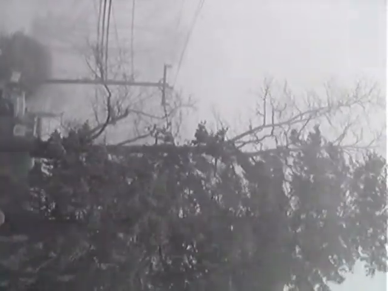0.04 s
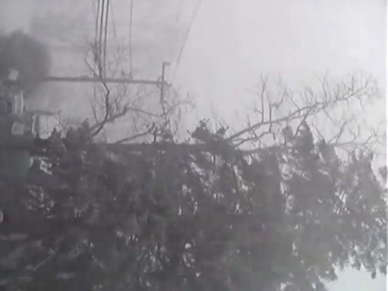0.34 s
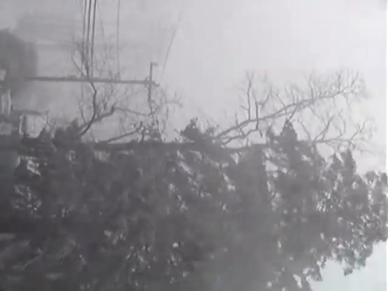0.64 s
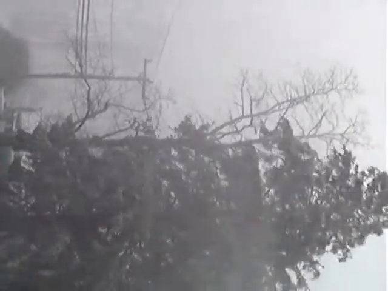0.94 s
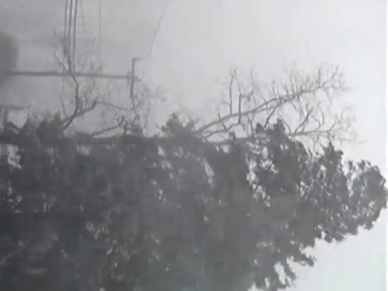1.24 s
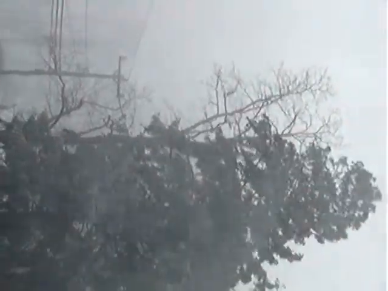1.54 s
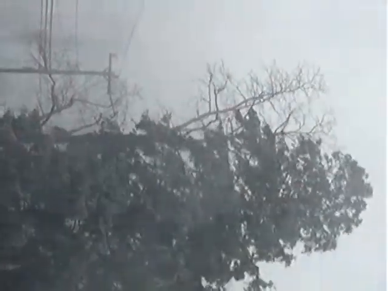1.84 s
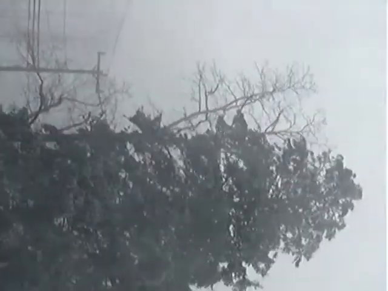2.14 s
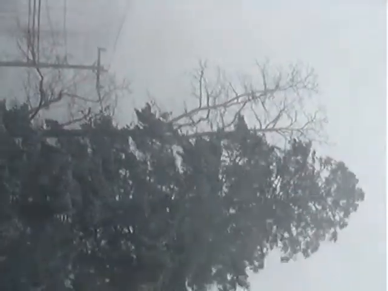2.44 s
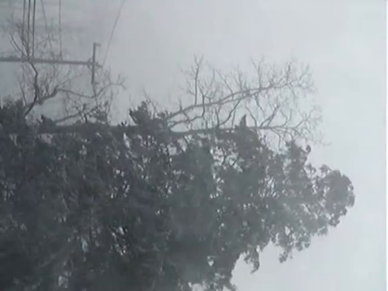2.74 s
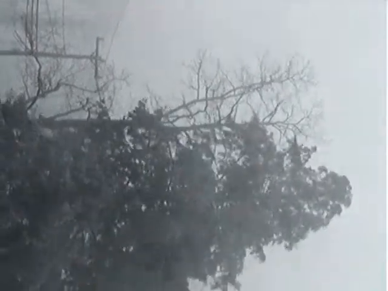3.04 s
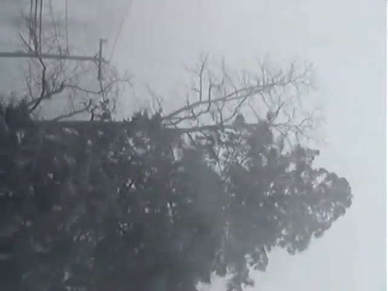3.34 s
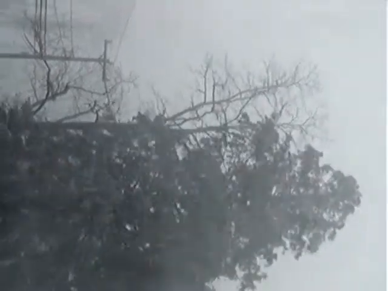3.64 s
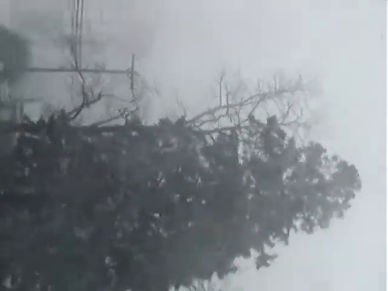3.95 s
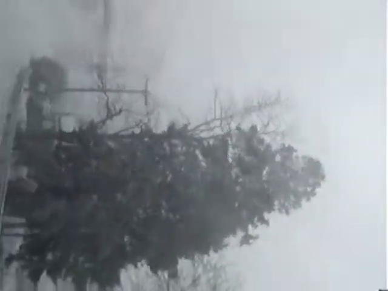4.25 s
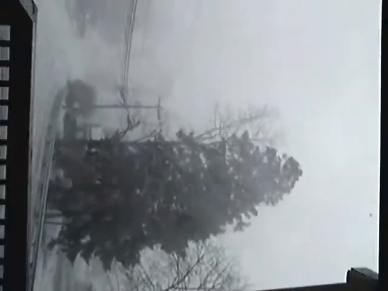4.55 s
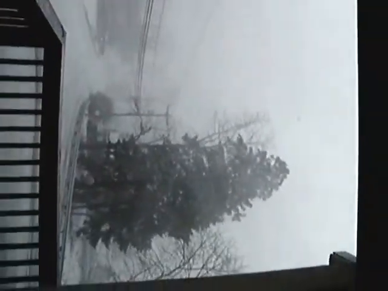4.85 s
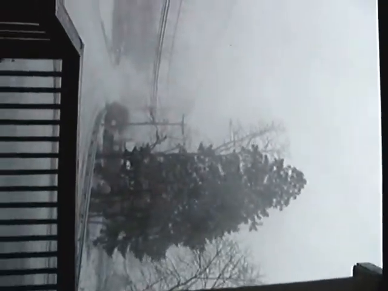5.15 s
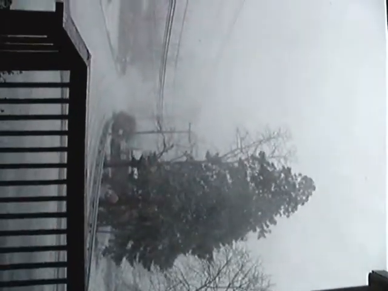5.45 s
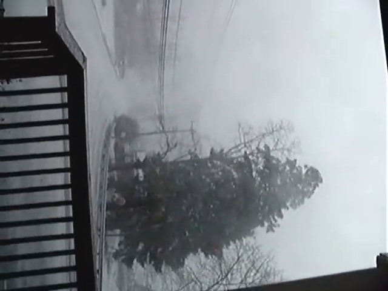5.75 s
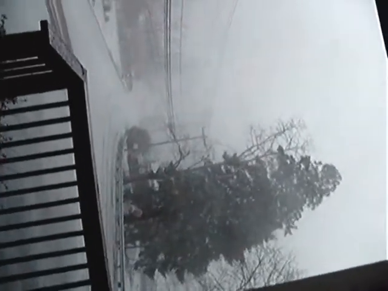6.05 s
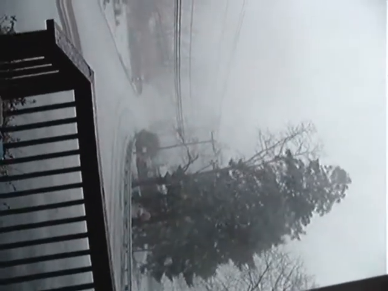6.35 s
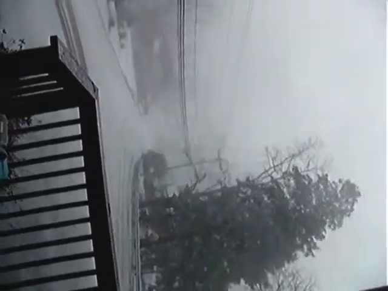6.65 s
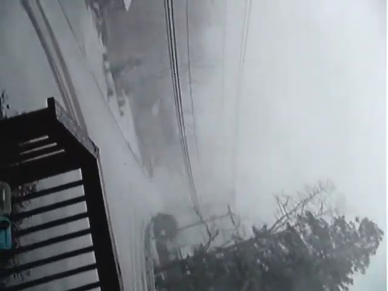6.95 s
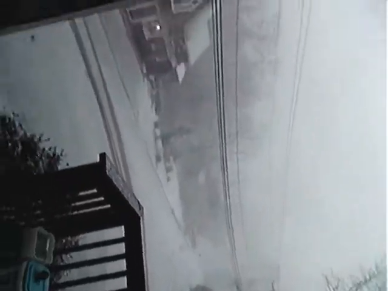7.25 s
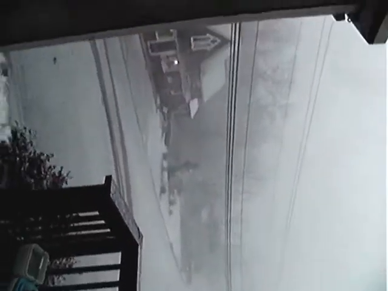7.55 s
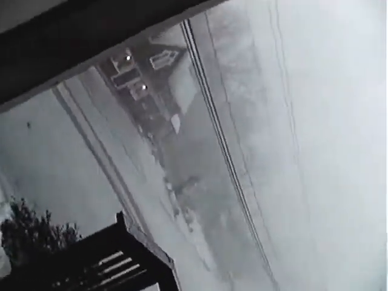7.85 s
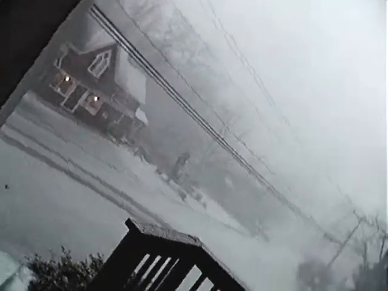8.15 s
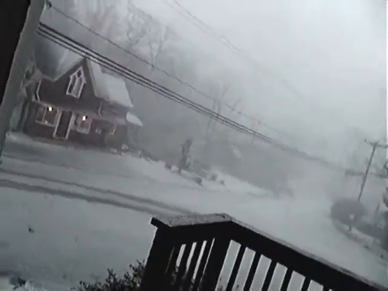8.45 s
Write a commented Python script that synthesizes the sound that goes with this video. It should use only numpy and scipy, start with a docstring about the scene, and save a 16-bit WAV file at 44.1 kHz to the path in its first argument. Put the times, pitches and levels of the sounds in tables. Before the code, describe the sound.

Gusty snowstorm wind roars through trees and hisses with driven snow, heard from a porch with a few faint handling bumps.

```python
"""Wind roars in bare trees: a snowstorm, heard from a porch through one small camera microphone.
Gusts rush through a tall evergreen, drive hissing snow and reach a shrub by the railing; one
whistles briefly, and the far storm rumbles underneath. A nearby wall reflects the wind, and its
hollow colour sinks as the camera moves out and turns.
The hand on the camera adds a soft swish, a few ticks and dull bumps."""
import sys
import numpy as np
from scipy import signal
from scipy.fft import rfft, irfft, next_fast_len
from scipy.io import wavfile
from scipy.ndimage import uniform_filter1d, map_coordinates

SR = 44100
rng = np.random.default_rng(int(sys.argv[2]) if len(sys.argv) > 2 else 0)


def log_audio(samples):
    """Write samples as a 16-bit WAV file to the path given in sys.argv[1]."""
    # one column per channel
    frames = np.atleast_2d(samples).T
    # limit to full scale, then quantise
    limited = np.clip(frames, -1, 1)
    pcm = np.round(limited * 32767).astype(np.int16)
    wavfile.write(sys.argv[1], SR, pcm)


N = 384111


def wind():
    """The wind around the porch: needles, twigs and snow flutter in the same eddies."""
    # the wind between gusts: time_s, level_db
    breeze = [(0, -26), (.55, -22.5), (2.4, -23.5), (3.95, -23.5), (4.9, -22.5), (6.7, -22.3), (7.6, -23),
              (8.15, -26), (8.71, -26)]
    # gusts that swell and ease: peak_s, half_width_s, lift_db
    gusts = [(.8, 0.14, 1), (1.035, 0.058, 2.5), (1.98, 0.18, 2), (2.69, .13, 1), (3, 0.33, 3),
             (4.68, 0.089, 2.1), (5.25, 0.12, 2.1), (5.76, 0.28, 2.5), (6.38, 0.53, 5), (7.5, 0.082, .8)]
    breeze_db, = curves(breeze)
    gust_db = sum(db * swell(peak_s, width_s) for peak_s, width_s, db in gusts)
    flutter = wobble(rate=14)
    return (bare_trees() + evergreen(breeze_db, gust_db, flutter)
            + shrub(flutter) + blown_snow(breeze_db, gust_db, flutter))


def bare_trees(gain_db=0.84):
    """Thick bare branches roar in the wind."""
    # strength of the roar: time_s, level_db
    roar = [(0.0, -27.5), (0.39, -25.5), (1.5, -24.5), (1.92, -26), (2.74, -25), (4.34, -28.5),
            (6.16, -26.5), (6.43, -27.5), (8.71, -28.5)]
    # spectrum of the branches: frequency_hz, level_db
    branches = [(150, -38.5), (240, -16), (285, -1), (330, 0.5), (390, 0.5), (425, -1.5), (480, 1),
                (580, 1.5), (680, -0.5), (820, -1), (1100, -4), (1600, -5), (3000, -42.5)]
    roar_db, = curves(roar)
    return amp(gain_db + roar_db + 0.38 * wobble(rate=7)) * rush(branches, patchy_db=0.3)


def evergreen(breeze_db, gust_db, flutter):
    """Air rushes through the thin needles of a tall evergreen, louder in each gust."""
    # spectrum of the needles: frequency_hz, level_db
    needles = [(400, -52), (900, -12.5), (1300, -6), (1700, -1.5), (2100, 1), (2600, -1.64), (3100, -6.5),
               (3800, -11.5), (4800, -20), (6500, -27.5), (10000, -47)]
    return amp(breeze_db + gust_db + 0.3 * flutter) * rush(needles, patchy_db=-0.12)


def blown_snow(breeze_db, gust_db, flutter, gain_db=2.1, db_per_gust_db=1.18):
    """Driven snow hisses, louder the harder it blows and the more snow the air carries."""
    # snow in the air, as hiss relative to the breeze: time_s, level_db
    snow_load = [(0, -21.5), (.48, -18.5), (1.1, -21), (2.4, -21.5), (4.5, -18.2), (5.3, -18.5),
                 (5.8, -21.5), (7.9, -22.5), (8.71, -18)]
    # spectrum of the hiss: frequency_hz, level_db
    hiss = [(2000, -25), (4000, -8), (5200, 2.5), (6400, 2.5), (7200, -3.5), (8500, -2.5), (9300, -5.5),
            (10000, -15)]
    load_db, = curves(snow_load)
    level_db = gain_db + breeze_db + load_db + db_per_gust_db * gust_db + 0.5 * flutter
    return amp(level_db) * rush(hiss, patchy_db=1.0)


def shrub(flutter):
    """A late gust reaches the twigs of a shrub beside the railing."""
    # the gust in the shrub: time_s, level_db
    rustle = [(5.4, -60), (6.2, -38), (7.55, -34), (7.9, -46), (8.71, -52)]
    # spectrum of the twigs: frequency_hz, level_db
    twigs = [(1500, -25), (3200, -2.5), (4400, 1.5), (5100, -2), (6000, -10.5), (7000, -9.5), (10000, -29)]
    rustle_db, = curves(rustle)
    return amp(rustle_db + 0.27 * flutter) * rush(twigs, patchy_db=0.7)


def whistle(peak_s=0.18, half_width_s=0.049, level_db=-26, pitch_hz=1470, glide_hz_per_s=580):
    """Air sheds vortices at an edge and sings for an instant, wavering and gliding up."""
    hz = pitch_hz + glide_hz_per_s * (seconds() - peak_s) + 12 * wobble(rate=70)
    level = amp(level_db + wobble(rate=43)) * swell(peak_s, half_width_s)
    return level * unit(np.sin(2 * np.pi * np.cumsum(hz) / SR))


def hand_bumps(t60_s=0.18, press_s=0.0066):
    """Soft knocks of the hand thud through the camera to its microphone."""
    # knocks: start_s, level_db, pitch_hz
    bumps = [(3.761, -21, 476), (4.412, -23, 197), (6.097, -20, 288)]
    t = np.arange(SR // 4) / SR
    push = 1 - np.exp(-t / press_s)  # soft skin takes a moment to press
    track = np.zeros(N)
    for start_s, db, hz in bumps:
        add(track, start_s, amp(db - 60 * t / t60_s) * push * np.sin(2 * np.pi * hz * t))
    return track


def case_ticks(t60_s=0.018):
    """The camera's case ticks in the hand, right at the microphone."""
    # bursts that excite the case: start_s, level_db
    ticks = [(4.828, -22), (4.9711, -24), (8.171, -20)]
    # response of the case: frequency_hz, gain_db
    case = [(2500, -27), (5000, 2), (5800, -1), (6600, 6), (7600, -6), (10000, -6.5)]
    t = np.arange(SR // 4) / SR
    track = np.zeros(N)
    for start_s, db in ticks:
        add(track, start_s, amp(db - 60 * t / t60_s) * rng.standard_normal(len(t)))
    return coloured(track, case)


def hand_swish(peak_s=3.745, peak_db=-28.5, rise_db_per_s=101, fall_db_per_s=331):
    """The hand slides over the camera: the swish builds, then stops short."""
    # spectrum of the rubbing: frequency_hz, level_db
    rubbing = [(500, -52), (1500, -9), (3500, 9), (6300, 6), (7500, 3), (9200, 3), (10200, -9.5)]
    since_s = seconds() - peak_s
    slide_db = np.minimum(rise_db_per_s * since_s, -fall_db_per_s * since_s)
    return amp(peak_db + slide_db) * unit(coloured(rng.standard_normal(N), rubbing))


def far_storm(level_db=-37.5):
    """The distant storm rumbles steadily from all sides."""
    # spectrum of the rumble: frequency_hz, level_db
    rumble = [(25, -29.5), (45, -24), (62, -17.5), (82, -18.5), (105, -14), (125, -8.5), (152, 0),
              (190, -1), (235, 1.5), (300, -1.5), (500, -21.5), (1200, -44)]
    return amp(level_db + 0.25 * wobble(rate=2.1)) * rush(rumble, patchy_db=0.7)


def porch(x, leave_s=5.75, wall_ms=0.41, lag_ms_per_s=0.46, fade_s=0.92, dull_hz=3200):
    """The near wall's dull reflection cuts a comb of dips that sinks and fades as the camera moves out."""
    away_s = np.maximum(seconds() - leave_s, 0)
    lag_ms = wall_ms + lag_ms_per_s * away_s
    strength = 0.37 / (1 + (away_s / fade_s) ** 2)
    reflected = filtered(x, lambda hz: 1 / (1 + (hz / dull_hz) ** 4))
    wall = strength * delayed(reflected, lag_ms)
    house_front = amp(-19) * delayed(reflected, ms=12.6)
    return x + wall + house_front


def rush(spectrum, patchy_db):
    """Turbulent noise of rms 1: eddies lift patches of it for a moment."""
    bands = signal.stft(rng.standard_normal(N), nperseg=512)[2]
    eddies = uniform_filter1d(rng.standard_normal(bands.shape), size=5, axis=0)  # across frequency
    eddies = uniform_filter1d(eddies, size=20, axis=1)  # across time
    noise = signal.istft(bands * amp(patchy_db * unit(eddies)), nperseg=512)[1][:N]
    return unit(coloured(noise, spectrum))


def amp(db):
    """Decibels to gain."""
    return 10 ** (np.asarray(db) / 20)


def unit(x):
    """x at rms 1."""
    return x / np.sqrt(np.mean(x ** 2) + 1e-20)


def seconds():
    """The time of every sample."""
    return np.arange(N) / SR


def swell(peak_s, half_width_s):
    """A bell curve that rises to 1 and falls again."""
    return np.exp(-((seconds() - peak_s) / half_width_s) ** 2)


def curves(rows):
    """One value per sample for each column after the time."""
    time_s, *columns = np.transpose(rows)
    return [np.interp(seconds(), time_s, column) for column in columns]


def wobble(rate):
    """A smooth random curve, rate knots a second."""
    knots = rng.standard_normal(int(N * rate / SR) + 4)
    return map_coordinates(knots, [np.arange(N) * rate / SR])


def delayed(x, ms):
    """x arriving later by a steady or changing lag."""
    return map_coordinates(x, [np.arange(N) - ms * SR / 1000])


def filtered(x, response):
    """x times a response of frequency."""
    size = next_fast_len(N + SR // 2)
    return irfft(rfft(x, size) * response(np.fft.rfftfreq(size, 1 / SR)), size)[..., :N]


def coloured(x, spectrum):
    """x shaped by (Hz, dB) points on a log axis."""
    points_hz, db = np.transpose(spectrum)
    return filtered(x, lambda hz: amp(np.interp(np.log(hz + 1), np.log(points_hz), db)))


def add(track, start_s, sound):
    """Mix a short sound into the track."""
    part = track[round(start_s * SR):][:len(sound)]
    part += sound[:len(part)]


def scene():
    """One microphone on the porch feeds both channels."""
    mono = porch(wind()) + far_storm() + whistle() + case_ticks() + hand_swish() + hand_bumps()
    return np.array([mono, mono])


def record(dry, top_hz=10150, edge_hz=150):
    """The camera keeps nothing above its band limit."""
    return filtered(dry, lambda hz: np.clip((top_hz - hz) / edge_hz + 0.5, 0, 1))


dry = scene()
out = record(dry)
log_audio(out)
```